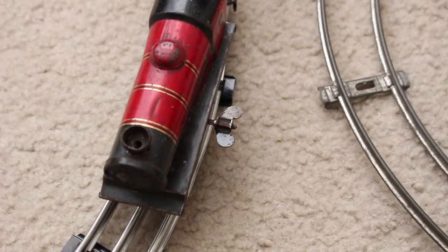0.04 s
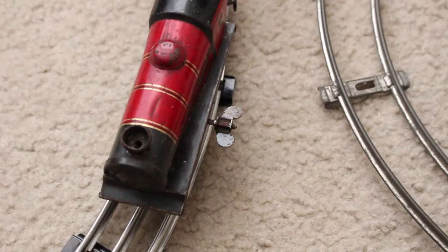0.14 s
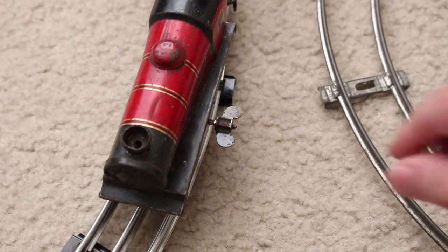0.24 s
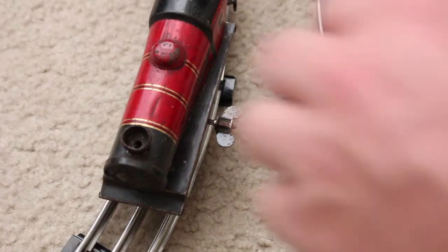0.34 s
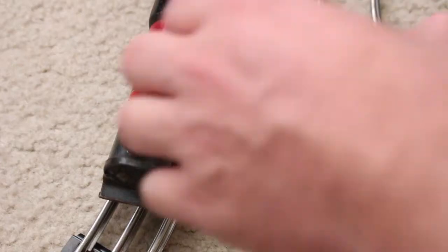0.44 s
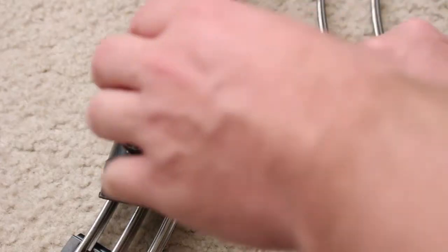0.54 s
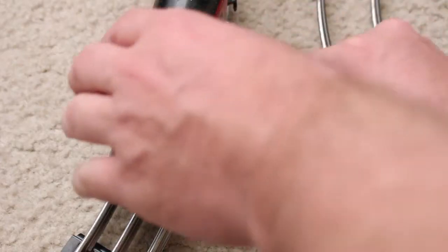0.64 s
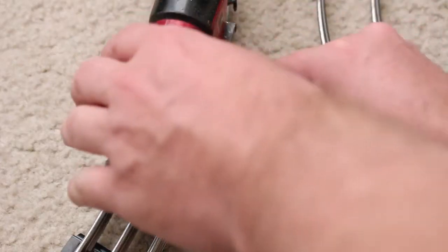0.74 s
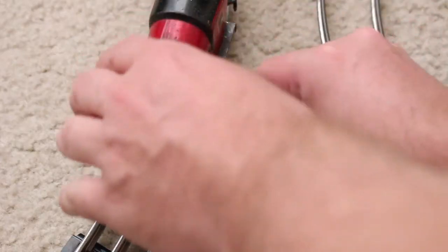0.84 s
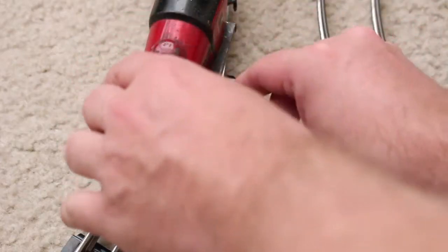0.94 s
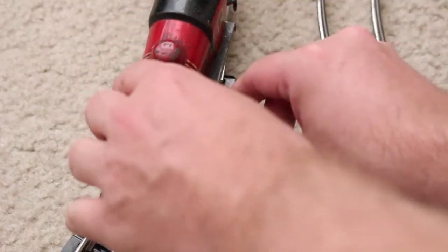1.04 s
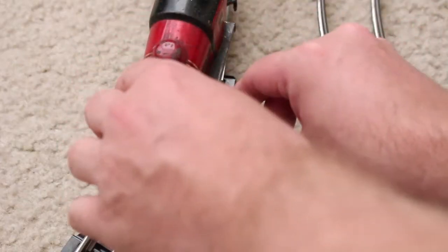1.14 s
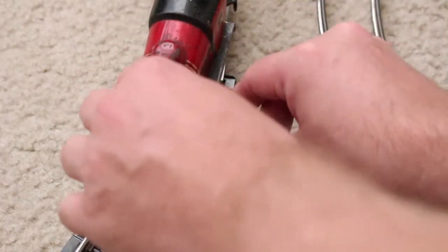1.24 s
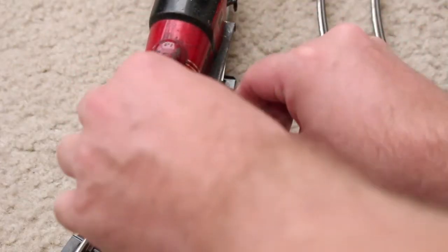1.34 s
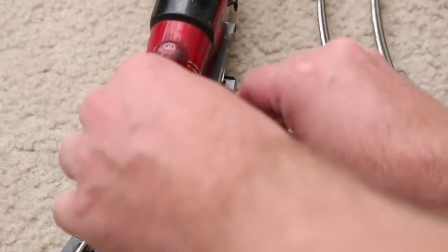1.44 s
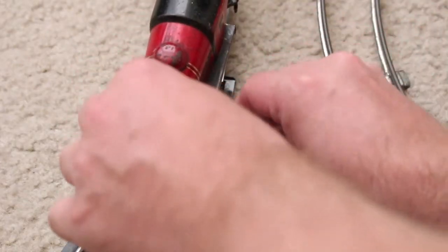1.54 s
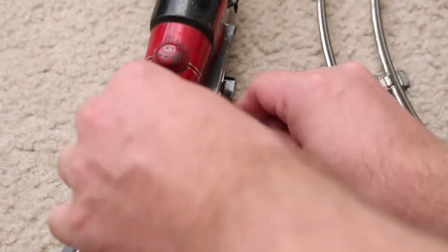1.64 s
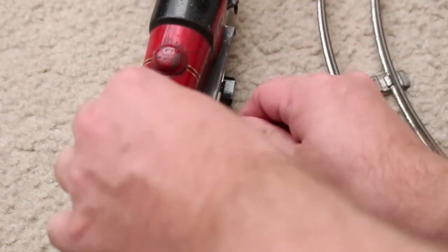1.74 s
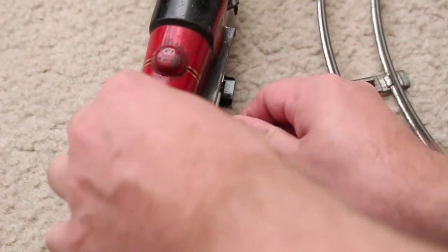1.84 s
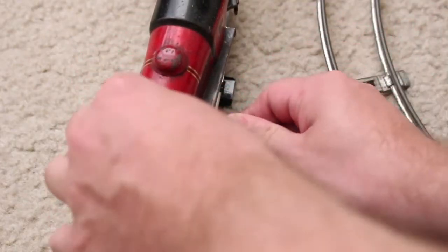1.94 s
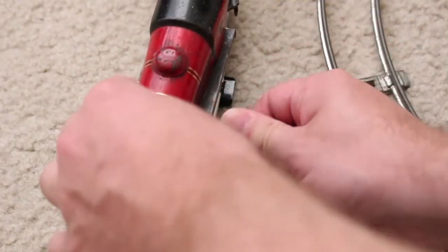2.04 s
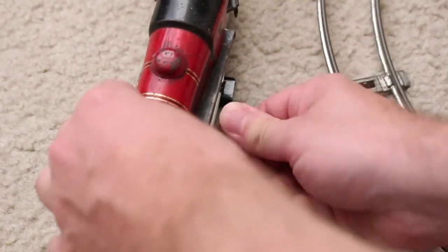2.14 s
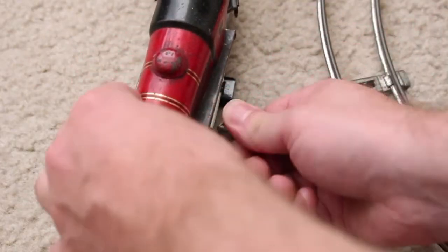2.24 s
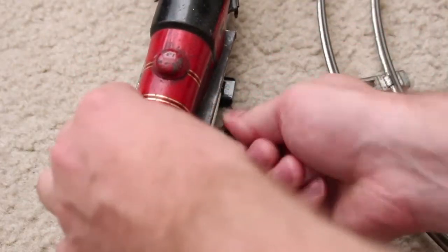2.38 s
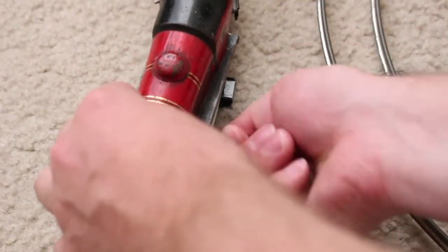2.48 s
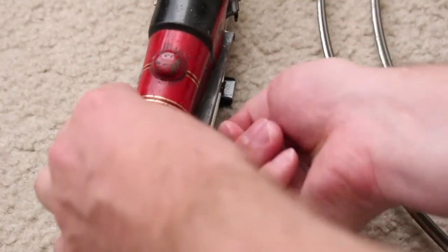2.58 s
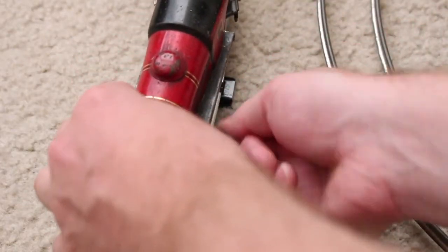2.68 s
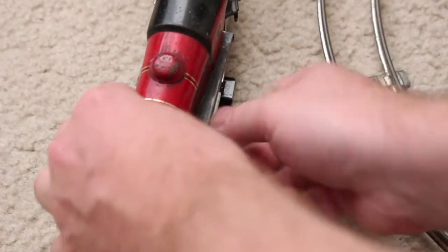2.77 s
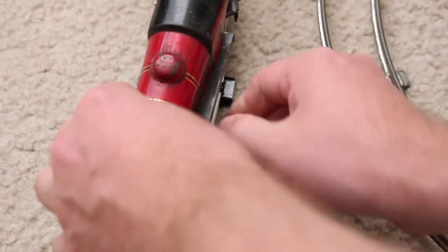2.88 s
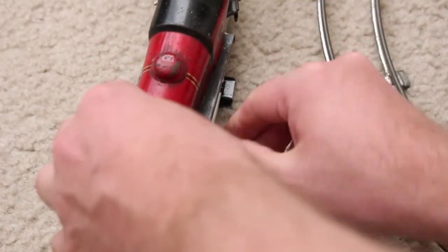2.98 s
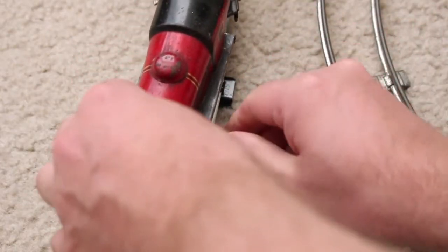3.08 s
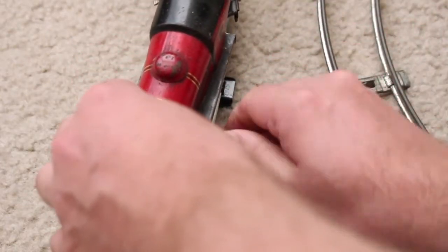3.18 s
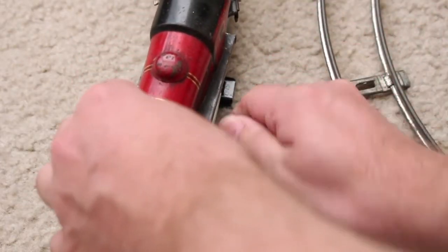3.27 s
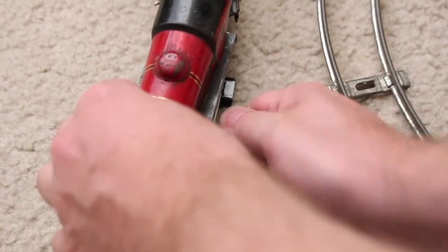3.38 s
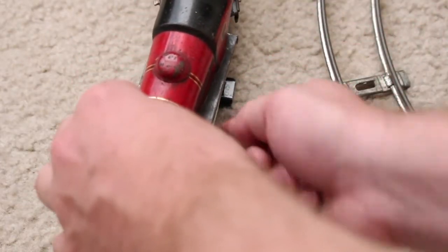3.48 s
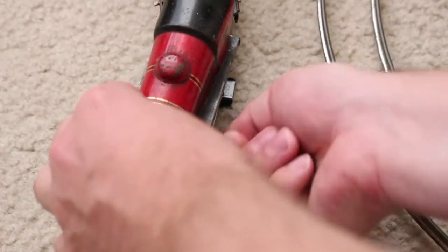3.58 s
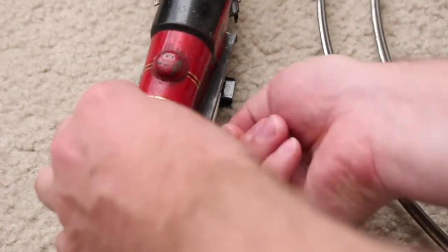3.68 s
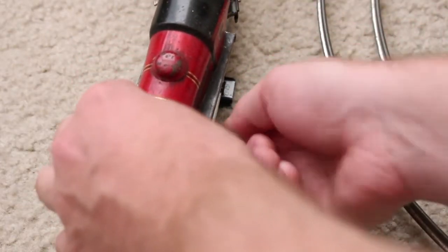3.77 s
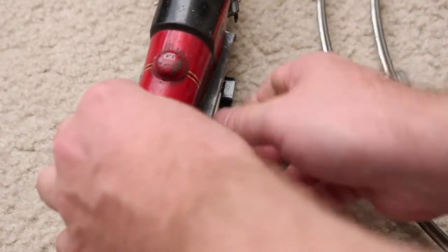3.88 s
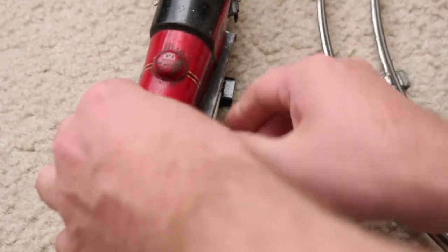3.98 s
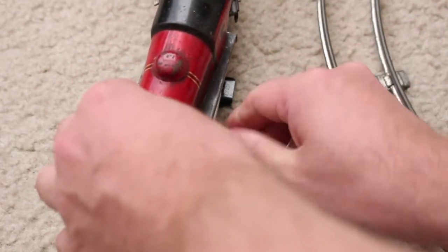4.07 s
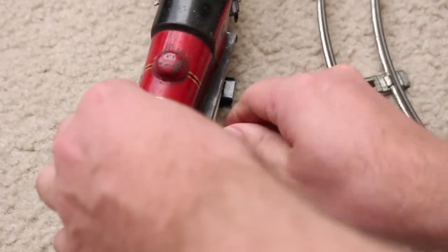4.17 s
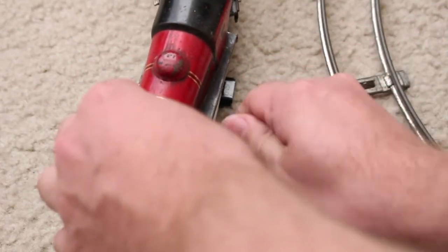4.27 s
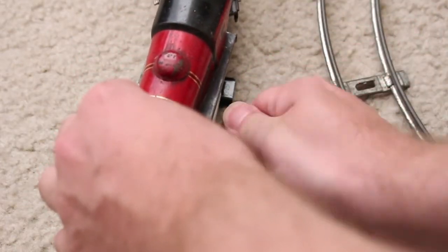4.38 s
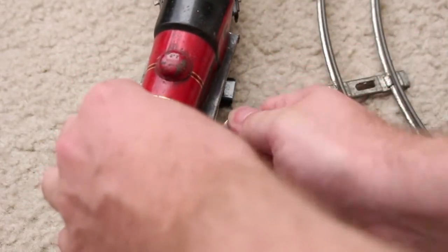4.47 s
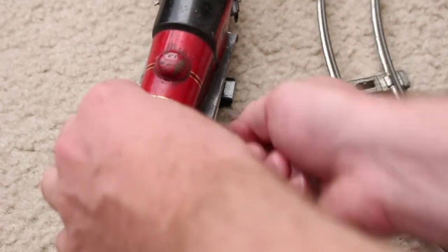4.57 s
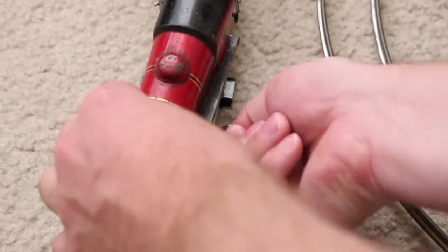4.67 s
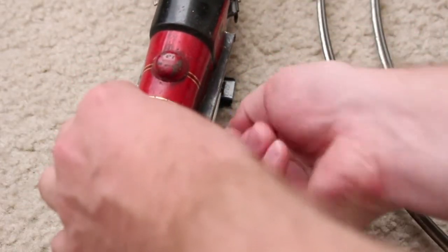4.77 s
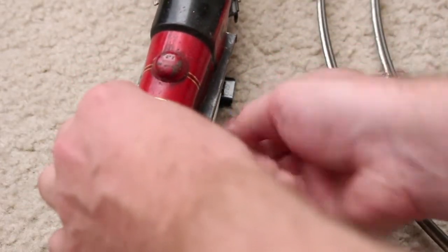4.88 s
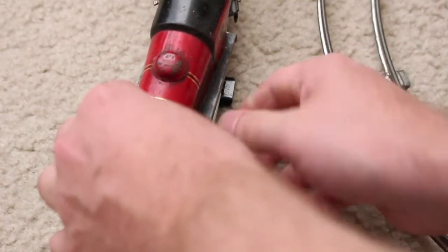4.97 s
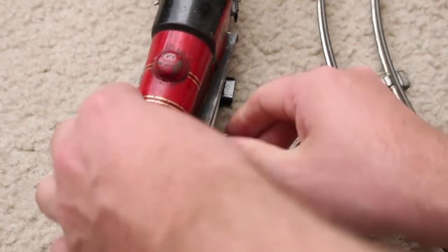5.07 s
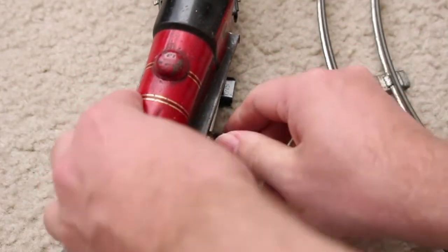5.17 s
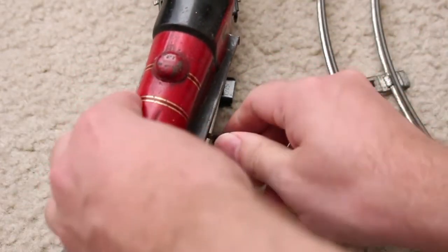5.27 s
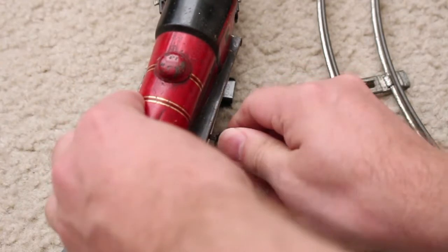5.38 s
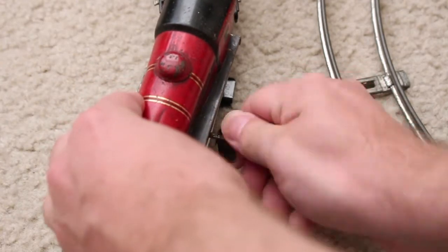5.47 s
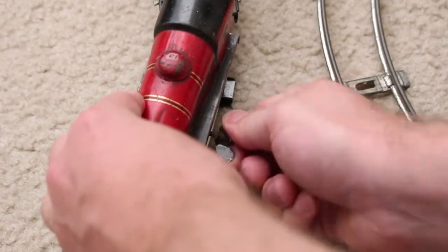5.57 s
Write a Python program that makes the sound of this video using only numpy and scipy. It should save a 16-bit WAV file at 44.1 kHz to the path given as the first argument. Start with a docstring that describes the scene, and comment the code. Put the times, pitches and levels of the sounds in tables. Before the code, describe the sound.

Faint room tone opens, then a few light metal taps as fingers grip the key of a tin toy train. Winding follows in uneven bursts of two to five crisp ratchet clicks, roughly a second apart. Softer key knocks, tiny scrapes and an occasional wheel bump fill the gaps, over a very soft handling rumble. The sound is close, in a small room with little echo.

```python
"""In a small, quiet room, a tin clockwork locomotive is wound by hand on a carpet.
At each turn of the key the pawl snaps over a few ratchet teeth, and each impact excites the modes of
the hand-damped tin shell. Between turns the loose key knocks and scrapes on its shaft as the fingers
take a new grip, and the wheels bump on the rails. Under it lie a soft handling rumble and room tone."""
import sys
import numpy as np
from scipy import signal
from scipy.fft import rfft, irfft
from scipy.io import wavfile

SR = 44100
rng = np.random.default_rng(int(sys.argv[2]) if len(sys.argv) > 2 else 0)


def store_wav(level_fs):
    """Save 16-bit WAV to argv[1]."""
    pcm = np.round(np.clip(np.atleast_2d(level_fs), -1, 1) * 32767)
    wavfile.write(sys.argv[1], SR, pcm.T.astype(np.int16))


N = 247842
BLOW_T = np.arange(SR // 4) / SR   # time axis of one impact, in seconds


def from_db(db):
    """Amplitude grows tenfold for every 20 dB."""
    return 10 ** (np.asarray(db) / 20)


def unit_rms(x):
    """Dividing by the root mean square gives unit power."""
    return x / np.sqrt(np.mean(x ** 2) + 1e-30)


def gain_at(points, hz):
    """A response curve joins (Hz, dB) points by straight lines on a log-frequency axis."""
    knots, level_db = np.transpose(points)
    return from_db(np.interp(np.log(hz + 1), np.log(knots), level_db))


def stereo_noise(spectrum, width, size, low_hz=15, high_hz=17000):
    """Mid-side stereo: two band-limited noises, added on the left and subtracted on the right."""
    hz = np.fft.rfftfreq(size, 1 / SR)
    mid, side = rfft(rng.standard_normal((2, size)))
    spread = gain_at(width, hz)
    band = 1 / np.sqrt((1 + (low_hz / (hz + 1)) ** 16) * (1 + (hz / high_hz) ** 16))
    pair = (mid + spread * side * [[1], [-1]]) / np.sqrt(1 + spread ** 2)
    return unit_rms(irfft(pair * gain_at(spectrum, hz) * band, size))


def add(out, start_s, sound):
    """Superposition: a sound sums with whatever is already there."""
    at = int(np.clip(round(start_s * SR), 0, out.shape[-1] - 1))
    out[:, at:at + sound.shape[-1]] += sound[:, :out.shape[-1] - at]


# Spectrum of the room tone. Each row: frequency in Hz, relative density in dB.
AIR_SPECTRUM = [(15, -40), (25, -12), (70, -9.5), (195, -7.5), (263, -9.5), (293, -11), (463, -9),
                (503, -12), (641, -11.5), (1160, -14), (1560, -14.5), (2220, -15.5), (4030, -18),
                (14800, -28), (16000, -40)]
# Its stereo width. Each row: frequency in Hz, side minus mid in dB.
AIR_SPREAD = [(60, 0), (110, 1), (200, -5), (380, 1.5), (700, 3), (1290, 2.5), (2380, 3), (4400, 1.5),
              (8120, 0), (15000, 1.5)]
# Its balance. Each row: frequency in Hz, left minus right in dB.
AIR_LEAN = [(60, -1.5), (110, -9.5), (200, -7.5), (380, -1.5), (700, -2), (1290, -1), (2380, -1.5),
            (4400, -0.5), (8120, -1.0), (15000, -1.5)]
def room_tone(air_db=-61.5, drone_hz=193, drone_db=-71.0):
    """Stationary noise gives low rumble and fine hiss; a narrow resonance adds a soft drone."""
    hz = np.fft.rfftfreq(N, 1 / SR)
    lean = gain_at(AIR_LEAN, hz) ** np.array([[.5], [-.5]])
    air = irfft(rfft(stereo_noise(AIR_SPECTRUM, AIR_SPREAD, N)) * lean, N)
    resonance = signal.iirpeak(drone_hz, Q=7.0, fs=SR)
    drone = signal.lfilter(*resonance, stereo_noise(AIR_SPECTRUM, AIR_SPREAD, N))
    return from_db(air_db) * air + from_db(drone_db) * unit_rms(drone)


# Spectrum of the reverberant tail. Each row: frequency in Hz, relative level in dB.
TAIL_SPECTRUM = [(150, 15.5), (400, 8), (1000, -1.5), (1800, -3), (3500, 1.5), (8000, 4), (15000, -0.5)]
# Its stereo width. Each row: frequency in Hz, side minus mid in dB.
TAIL_SPREAD = [(200, -3), (1500, -9), (4000, -9), (15000, 10)]
# Reflections from nearby surfaces. Each row: mean delay in seconds, gain in dB.
REFLECTIONS = [(.0053, -15), (0.013, -12)]
def room(x, t60=0.27, treble_t60=0.22, wet_db=-2.0, build_s=0.0032, sway=.12, size=12288):
    """Reverberation: two early reflections and a diffuse tail whose treble dies first."""
    t = np.arange(size) / SR
    diffuse = stereo_noise(TAIL_SPECTRUM, TAIL_SPREAD, size)
    low = signal.sosfiltfilt(signal.butter(2, 6000, fs=SR, output="sos"), diffuse)
    treble = diffuse - low
    tail = low * np.exp(-np.log(1000) * t / t60) + treble * np.exp(-np.log(1000) * t / treble_t60)
    build_up = 1 - np.exp(-(t / build_s) ** 2)
    tail = unit_rms(tail * build_up) / np.sqrt(size)
    out = from_db(wet_db) * signal.fftconvolve(x, tail, axes=1)
    add(out, 0, x)
    for delay_s, echo_db in REFLECTIONS:
        stretch = 1 + sway * (2 * rng.random() - 1)   # the moving hands scatter each sound anew
        add(out, delay_s * stretch, from_db(echo_db) * x)
    return out


# Stereo width of the toy's sounds. Each row: frequency in Hz, side minus mid in dB.
TOY_SPREAD = [(200, 0), (700, -24), (1400, -13), (2200, -10.5), (4000, -7), (8000, -4), (15000, -3)]
def handling(level_db=-71.0, lumpy_db=-1.5, lumps_per_s=9):
    """Structure-borne sound: the hands rock the toy, sending an uneven rumble through the carpet."""
    t = np.arange(N) / SR
    lumps = np.interp(t * lumps_per_s, np.arange(200), rng.standard_normal(200))
    effort = np.interp(t, [1.7, 2.1], [0, 1])   # rises as winding starts
    rumble = stereo_noise([(30, -40), (80, 3.5), (130, -21), (400, -16)], TOY_SPREAD, N, high_hz=528)
    return from_db(level_db + lumpy_db * lumps) * effort * rumble


def contact_gain(hz, favoured_hz, lift_db=8.0, octaves=0.06):
    """Modal coupling: the point of contact decides which modes are driven hardest."""
    nearness = [np.exp(-.5 * (np.log2((hz + 1) / centre) / octaves) ** 2) for centre in favoured_hz]
    return from_db(lift_db * np.max(nearness, axis=0))


# Spectrum of the crowded, short-lived tin modes. Each row: frequency in Hz, relative density in dB.
TIN_SPECTRUM = [(150, -32), (400, -21.5), (680, -13.5), (980, -15), (1550, -3.5), (1920, -7.5),
                (2170, -3.5), (2750, -8.5), (3400, -14), (4500, -11), (6500, -11), (8000, -3), (9600, -4.5),
                (11000, -3), (15500, -7.5)]
# The four bands of an impact: knock, shell, clack and crack. Each row: lower and upper edge in Hz,
# rise and decay time in seconds, flare gain in dB, ring gain in dB.
BANDS = [(149, 1120, 0.0006, 0.0054, 9, -36), (1064, 2330, 0.00076, 0.0033, 2.5, 0.5),
         (2740, 6650, 0.0012, 0.0048, 8.5, 3.5), (6200, 14600, 0.00068, 0.0036, 10.5, -2)]
BRIGHT_SHARE = np.array([0.14, 0, 0.51, 0.9])   # share of an impact's brightness that reaches each band
def flare(levels_db, favoured_hz, size=2048):
    """Modal overlap: as metal meets metal, crowded modes merge into noise that dies in milliseconds."""
    t = BLOW_T[:size]
    out = np.zeros((2, len(BLOW_T)))
    colour = contact_gain(np.fft.rfftfreq(size, 1 / SR), favoured_hz)
    for level_db, (low_hz, high_hz, rise_s, decay_s, flare_db, _) in zip(levels_db, BANDS):
        envelope = (1 - np.exp(-t / rise_s)) * np.exp(-t / decay_s)
        envelope_rms = np.sqrt(np.mean(envelope ** 2)) / envelope.max()
        noise = stereo_noise(TIN_SPECTRUM, TOY_SPREAD, size, low_hz, high_hz)
        crowd = irfft(rfft(noise) * colour, size)
        out[:, :size] += from_db(level_db + flare_db) * unit_rms(crowd * envelope) * envelope_rms
    return out


# Ringing modes of the shell and motor plates.
# Each row: frequency in Hz, relative level in dB, time to decay by 60 dB in seconds.
SHELL_MODES = [(656, 0, 0.24), (890, -26, 0.02), (1217, 4.5, 0.048), (1327, -12, 0.39), (1318, 0, 0.56),
               (1592, 11, 0.13), (1555, 0.5, 0.49), (1692, 6.5, 0.21), (1855, 5.5, 0.078), (1920, -26, .07),
               (2162, 14.5, 0.049), (2212, 1, 0.04), (2540, 2.5, 0.25), (2455, 3, 0.13),
               (2710, -14.5, 0.037), (3010, 0, 0.038), (3470, -7.5, 0.016), (3340, -25, 0.045),
               (3250, -10, 0.2), (3576, -11, 0.1), (7450, -2, 0.085), (7640, -5, 0.16), (8730, -0.5, 0.11)]
def shell_ring(levels_db, favoured_hz, grip_s=.008, lasting_db=-16.0, scatter_db=2.0, detune=0.0013):
    """Damped free vibration: the hand absorbs the first swing, and the rest spreads over the shell."""
    hz, mode_db, t60 = np.transpose(SHELL_MODES)
    strength, cycles, phase_split, shift = rng.standard_normal((4, len(hz)))
    low_hz, *_, ring_db = np.transpose(BANDS)
    band = np.digitize(hz, low_hz[1:])

    def share_energy(gains):
        """The modes of a band divide its energy among them."""
        band_gain = from_db(levels_db + ring_db) / np.sqrt(np.bincount(band, gains ** 2))
        return (gains * band_gain[band])[:, None]

    gains = from_db(mode_db + scatter_db * strength)
    coupling = contact_gain(hz, favoured_hz)
    first_swing = share_energy(gains * coupling) * np.exp(-BLOW_T / grip_s)
    lasting = share_energy(gains * coupling ** 0.75) * from_db(lasting_db)
    poles = 2j * np.pi * hz * (1 + detune * shift) - np.log(1000) / t60
    modes = (first_swing + lasting) * np.exp(np.outer(poles, BLOW_T))
    # each side hears a mode in its own phase
    phases = 2 * np.pi * cycles + phase_split * gain_at(TOY_SPREAD, hz) * [[1], [-1]]
    return np.real(np.exp(1j * phases) @ modes)


def blow(levels_db, favoured_hz, ring_db, swell_s=0.0014):
    """The impulse response of the tin: a short flare, and a few clear modes that ring on."""
    ring = shell_ring(levels_db + ring_db, favoured_hz) * (1 - np.exp(-BLOW_T / swell_s))
    return flare(levels_db, favoured_hz) + ring


def scrape(length_s, level_db, bright_db, favoured_hz, slips_per_s=900, uneven_db=5.5, edge_hz=3200):
    """Stick-slip friction: a run of tiny uneven slips, each one a blow on the same tin."""
    size = len(BLOW_T)
    slipping = rng.random(size) < slips_per_s / SR
    force = from_db(uneven_db * rng.standard_normal(size))
    stroke = np.sqrt(np.abs(np.sin(np.pi * np.minimum(BLOW_T / length_s, 1))))
    slips = slipping * force * stroke
    levels_db = np.array([-16.0, 0, -7.5, -11.5]) + bright_db * BRIGHT_SHARE
    tin = blow(levels_db, (favoured_hz, edge_hz), ring_db=-1.5)
    sound = signal.fftconvolve(slips[None], tin, axes=1)[:, :size]
    return from_db(level_db) * unit_rms(sound) * np.sqrt(length_s * SR / size)


KEY_RUB_HZ, KEY_PING_HZ = 1750, 2620   # favoured by the key's rubbing; the key's own ping
# Spectrum of a tick: the relative level of each band in dB.
TICK_BANDS_DB = [-14, -0.5, -8, -19]
# Turns of the key that rattle. Each row: start in seconds, end in seconds.
KEY_TURNS = [(2.4, 2.7), (3.65, 3.85), (4.4, 4.85)]
def key_rattle(level_db=-56.0, spread_db=1, ring_db=10.0, ticks_per_s=20):
    """Backlash: as the key turns, its play on the shaft gives faint, dull ticks at uneven moments."""
    out = np.zeros((2, N))
    for start_s, end_s in KEY_TURNS:
        for slot_s in np.arange(start_s, end_s, 1 / ticks_per_s):
            levels_db = level_db + spread_db * rng.standard_normal() + np.array(TICK_BANDS_DB)
            tick_s = slot_s + rng.random() / ticks_per_s
            add(out, tick_s, blow(levels_db, (KEY_RUB_HZ, KEY_PING_HZ), ring_db))
    return room(out)[:, :N]


# Spectrum of a bump: the relative level of each band in dB.
BUMP_BANDS_DB = [-7.5, 1.5, -13, -18]
# Wheels bumping on the rails as the toy is pushed.
# Each row: start in seconds, relative strength in dB, brightness in dB, favoured frequency in Hz.
WHEEL_BUMPS = [(1.6968, -54, 2, 1310), (2.9719, -48, -9, 1760), (3.0133, -47, 13.5, 937),
               (4.0557, -51, -5, 1330), (5.0132, -54, 5.5, 960)]
def wheel_bumps(level_db=-4.5, ring_db=0.5):
    """Impact of a larger mass: the whole toy strikes its track with a heavier, lower blow."""
    out = np.zeros((2, N))
    for start_s, strength_db, bright_db, hz in WHEEL_BUMPS:
        levels_db = level_db + strength_db + np.array(BUMP_BANDS_DB) + bright_db * BRIGHT_SHARE
        add(out, start_s, room(blow(levels_db, [hz], ring_db)))
    return out


# Slides of the key on its shaft.
# Each row: start in seconds, length in seconds, relative level in dB, brightness in dB.
KEY_SLIDES = [(1.508, .039, -51.5, -6), (1.551, 0.072, -61.5, -7), (2.245, 0.051, -58, -10),
              (2.582, 0.13, -60, -16), (2.797, .07, -56, -20), (3.255, 0.025, -53.5, -1),
              (3.816, 0.036, -48.5, -4.5), (3.914, 0.035, -58.5, -30), (4.052, 0.015, -50, 2.5),
              (4.286, .026, -45.5, -5), (4.851, .044, -50, -7), (5.14, 0.043, -60, -8),
              (5.188, .045, -51.5, -14), (5.309, .0436, -50, -13.5)]
def key_scrapes(level_db=-1.0):
    """Sliding friction: the key rubs on its shaft as it is gripped or let go."""
    out = np.zeros((2, N))
    for start_s, length_s, slide_db, bright_db in KEY_SLIDES:
        add(out, start_s, room(scrape(length_s, slide_db + level_db, bright_db, KEY_RUB_HZ)))
    return out


# Knocks of the loose key.
# Each row: start in seconds, relative strength in dB, brightness in dB, favoured frequency in Hz.
KEY_KNOCKS = [(1.0849, -56.5, -15, 2480), (1.1608, -52, -14, 1790), (1.3258, -61, -6, 2560),
              (1.5217, -42.5, 1, 1720), (1.5363, -43.5, -5, 1710), (1.6017, -47, -11, 2240),
              (2.2098, -41.5, -17, 1600), (2.5266, -44, -5, 2120), (2.5625, -39, -10, 1810),
              (2.6555, -42, 8.5, 1620), (2.7025, -43, 8, 2320), (3.2379, -42.5, 1, 1700),
              (3.266, -43.5, 10.5, 1680), (3.323, -47.5, 0, 2130), (3.7213, -46, -12, 1720),
              (3.7793, -43, 7, 1600), (3.8187, -39.5, 7.5, 1560), (3.8312, -37.5, -3, 1580),
              (4.276, -44.5, 0, 2140), (4.3061, -40.5, -10, 2090), (4.7219, -42, 2, 1860),
              (4.8695, -37.5, -3, 1600), (5.196, -48.5, -3, 1890), (5.242, -43, -10, 1860),
              (5.3968, -41.5, 11, 2320), (5.5093, -46, 3, 1520)]
def key_knocks(level_db=-5.5, ring_db=6.5, bands_db=(-21.5, -1, -11.5, -19.5)):
    """Transmission through a solid: light blows of the key reach the shell by the winding shaft."""
    out = np.zeros((2, N))
    for start_s, strength_db, bright_db, hz in KEY_KNOCKS:
        levels_db = level_db + strength_db + np.array(bands_db) + bright_db * BRIGHT_SHARE
        add(out, start_s, room(blow(levels_db, (hz, KEY_PING_HZ), ring_db)))
    return out


# Spectrum of a typical snap: the relative level of each band in dB.
SNAP_BANDS_DB = [-20, 0, -10.5, -9.5]
# Growth of each band in dB per dB of strength: a harder snap goes mostly into the shell.
SNAP_SLOPES = [0.36, 0.83, 0.61, .8]
# The pawl dropping off a tooth. Each row: time in seconds, relative strength in dB, brightness in dB,
# favoured shell frequency in Hz, ping frequency in Hz, level of the preceding rub in dB.
PAWL_SNAPS = [(1.76, -23.5, 0, 1550, 3440, -52), (2.1442, -25, 1, 2210, 3980, -59),
              (2.3341, -35.5, 3, 2210, 3550, -65), (2.4639, -29, -3, 1610, 3440, -66),
              (2.538, -38.5, 3, 2080, 3300, -56), (3.3783, -32, -1, 2020, 3010, -70),
              (3.4673, -37, 0.5, 1300, 3400, -66), (3.555, -34, 0, 2020, 3400, -58),
              (3.6424, -29.5, 0, 1450, 3550, -54), (4.39, -28, 2.5, 1990, 3380, -77),
              (4.5239, -33.5, -1, 2240, 3500, -60.5), (4.6266, -36.5, 2.5, 2140, 3250, -60),
              (4.6899, -36, 2.5, 2180, 3280, -52), (4.8194, -42.5, -4, 1950, 3470, -60),
              (5.5286, -35.5, -0.3, 1960, 3220, -55.5), (5.6124, -34.8, -4.5, 2290, 3200, -62)]
def ratchet(level_db=-3.0, typical_db=-33, ring_db=5.5, rub_s=.022, slip_s=0.0029, bounce_s=.0055):
    """Sudden elastic release: the pawl rubs up a tooth, slips off, strikes the next and bounces once."""
    out = np.zeros((2, N))
    slip_db = -19.5 - 4.0 * BRIGHT_SHARE   # weaker and duller than the snap
    bounce_db = -14.5 + 9.5 * BRIGHT_SHARE   # weaker and brighter
    for snap_s, strength_db, bright_db, *favoured_hz, rub_db in PAWL_SNAPS:
        force_db = typical_db + (strength_db - typical_db) * np.array(SNAP_SLOPES)
        levels_db = level_db + force_db + np.array(SNAP_BANDS_DB) + bright_db * BRIGHT_SHARE
        click = flare(levels_db + slip_db, favoured_hz)
        add(click, slip_s, blow(levels_db, favoured_hz, ring_db))
        add(click, slip_s + bounce_s, flare(levels_db + bounce_db, favoured_hz))
        add(out, snap_s - slip_s, room(click))
        rub = scrape(rub_s, rub_db, bright_db=-11.0, favoured_hz=1800)
        add(out, snap_s - rub_s, room(rub))
    return out


def scene(pan_db=-0.56):
    """A level difference between the channels places the nearby toy a little to the right."""
    air = room_tone()
    toy = handling() + ratchet() + key_knocks() + wheel_bumps() + key_scrapes() + key_rattle()
    return toy * from_db([[pan_db], [-pan_db]]) + air


def record(dry, cutoff_hz=16000):
    """Band limiting: a steep low-pass cuts the top; the sound fades in after a moment of silence."""
    fade_in = np.interp(np.arange(N) / SR, [.09, .125], [0, 1])
    low_pass = signal.ellip(10, .1, 80, cutoff_hz, fs=SR, output="sos")
    return signal.sosfilt(low_pass, dry * fade_in)


dry = scene()
out = record(dry)
store_wav(out)
```